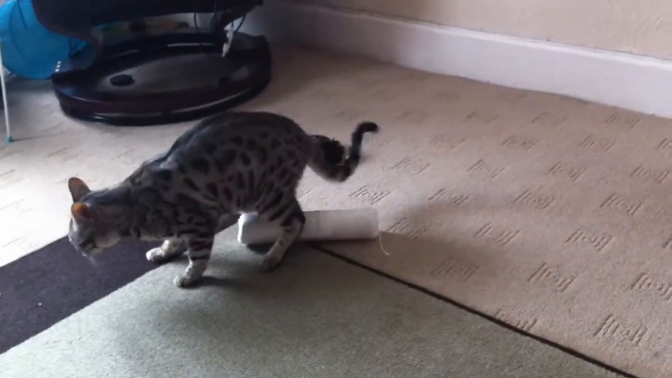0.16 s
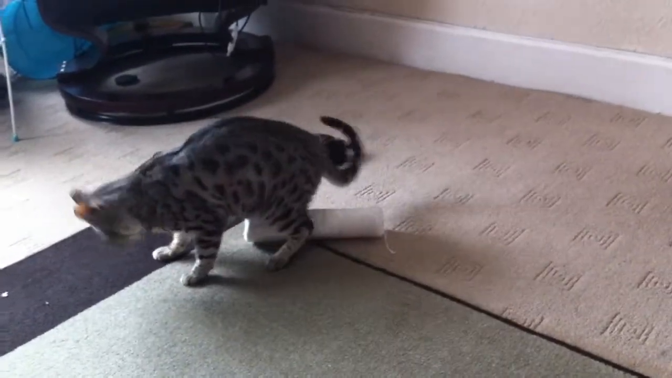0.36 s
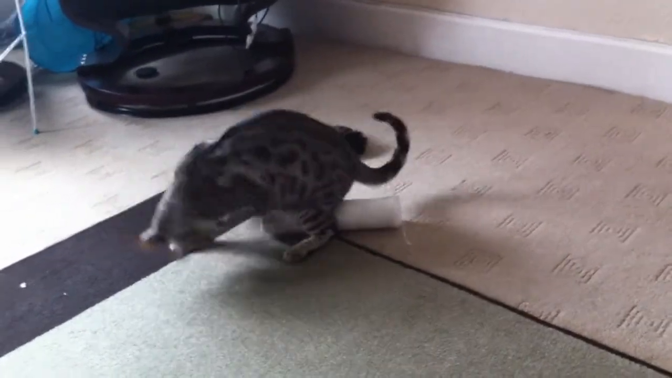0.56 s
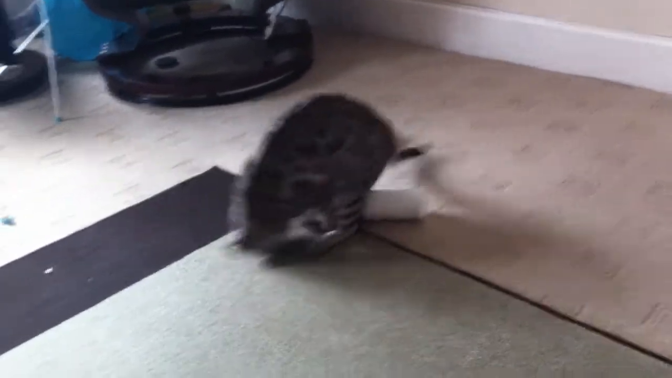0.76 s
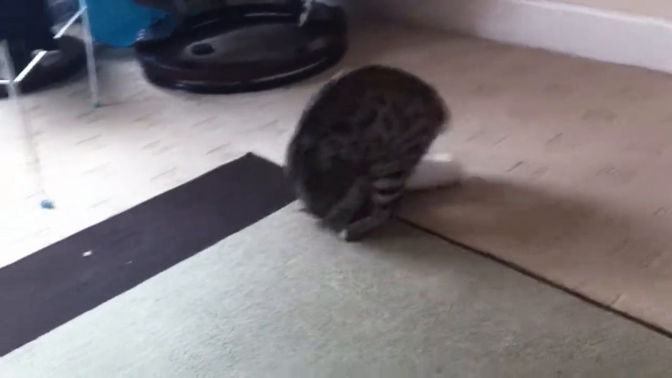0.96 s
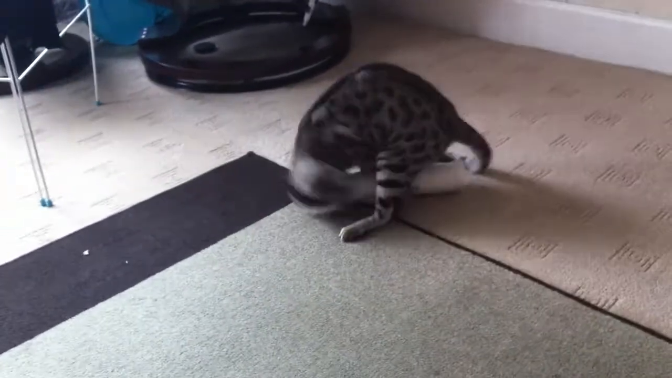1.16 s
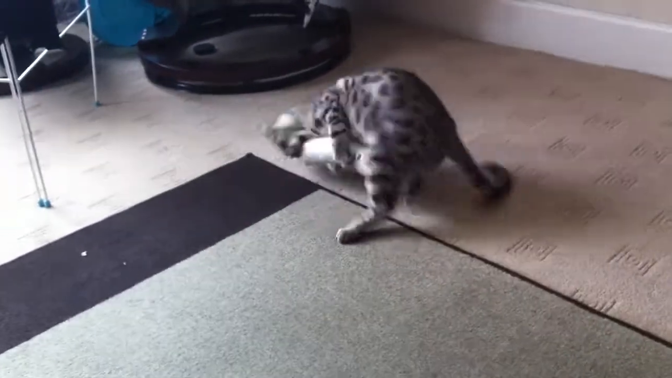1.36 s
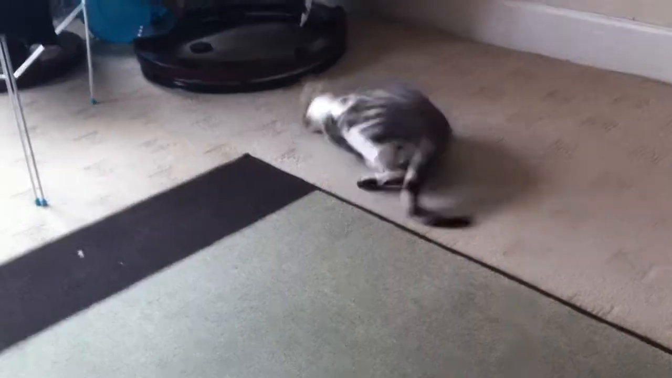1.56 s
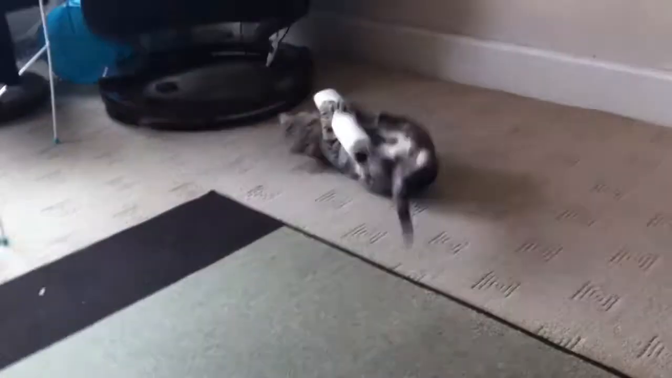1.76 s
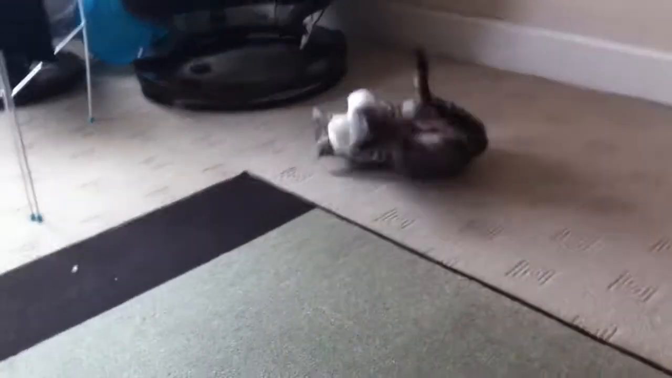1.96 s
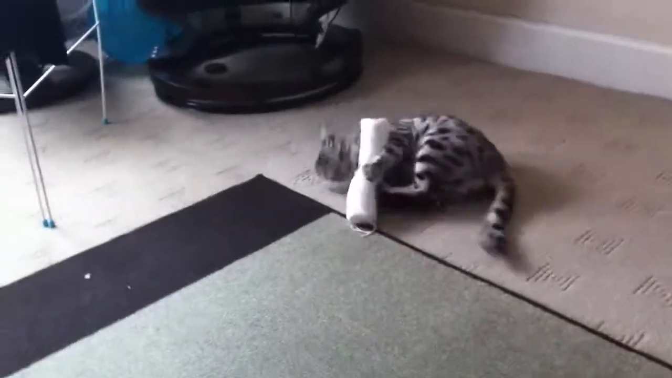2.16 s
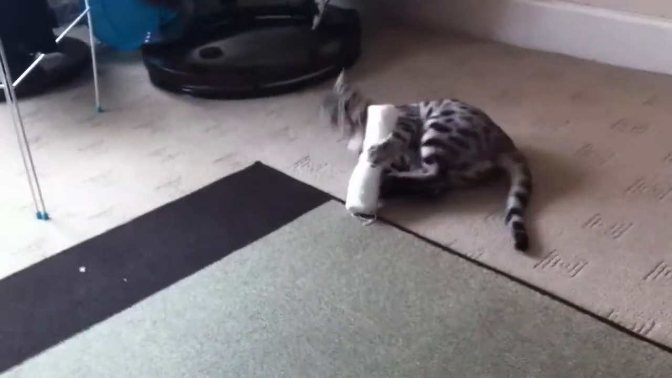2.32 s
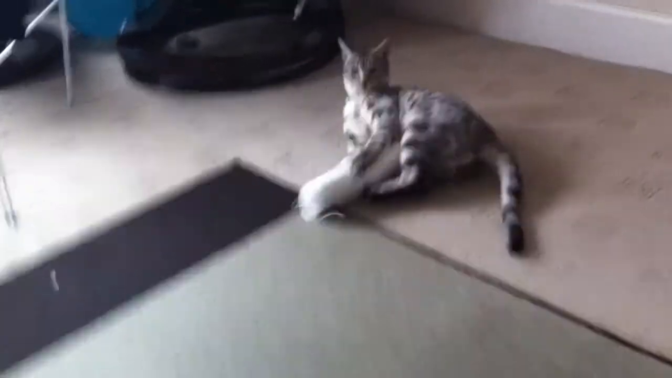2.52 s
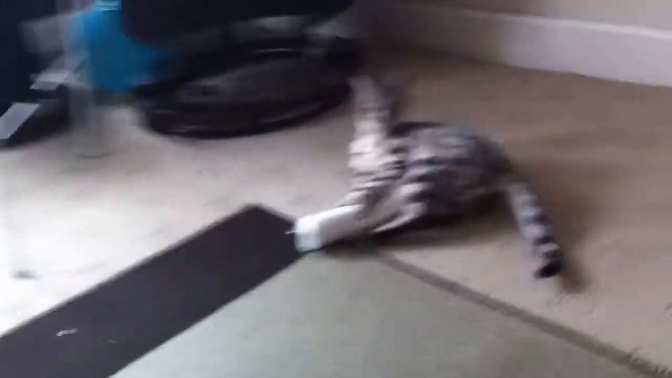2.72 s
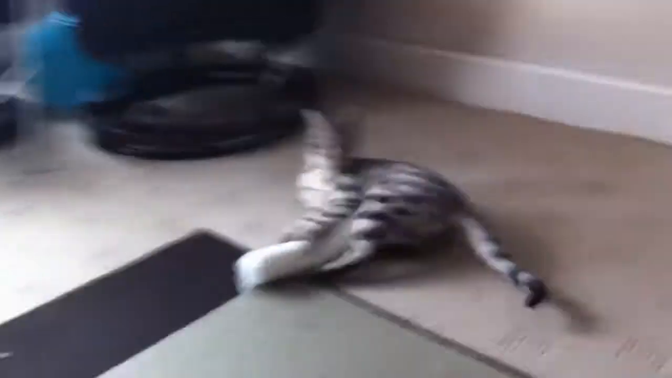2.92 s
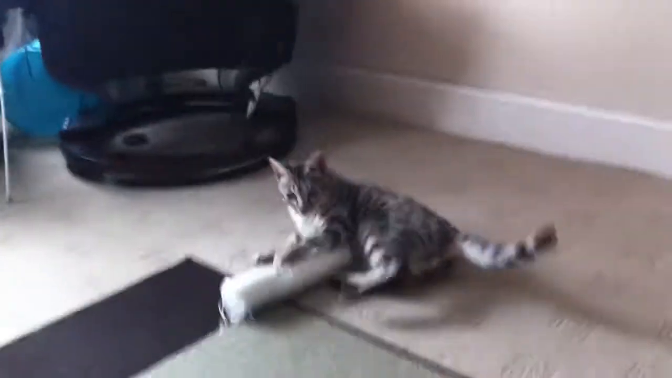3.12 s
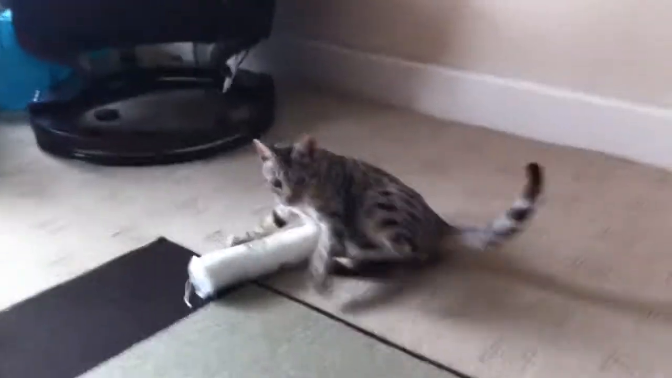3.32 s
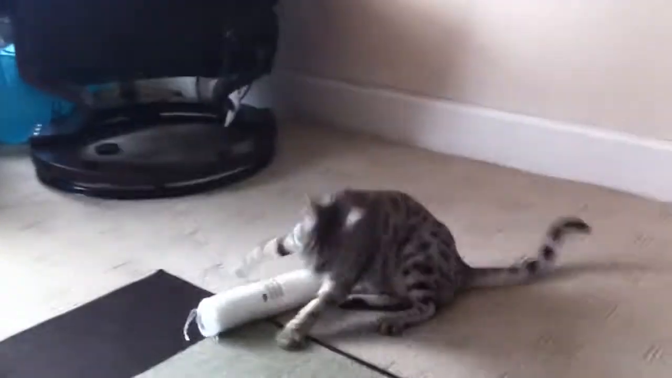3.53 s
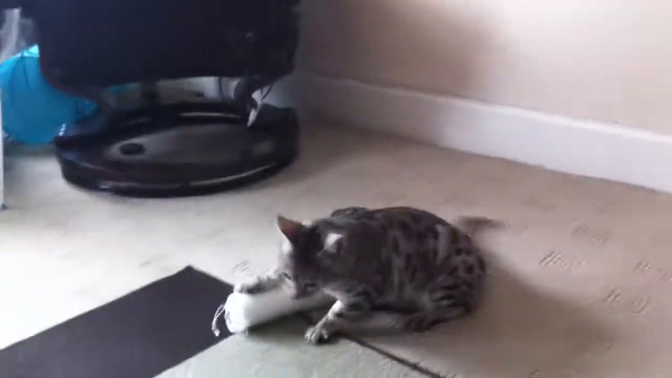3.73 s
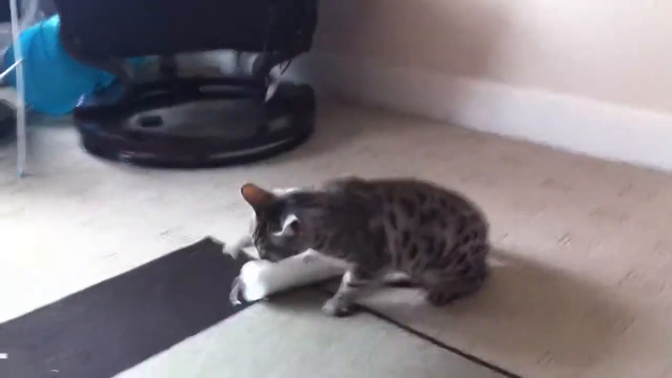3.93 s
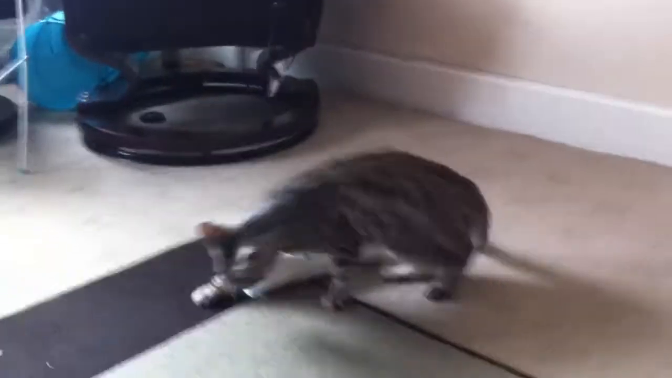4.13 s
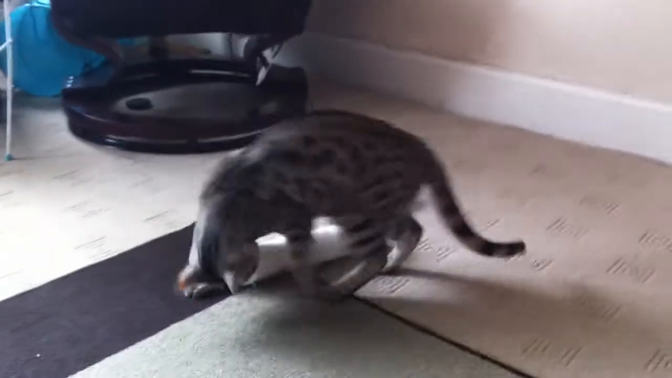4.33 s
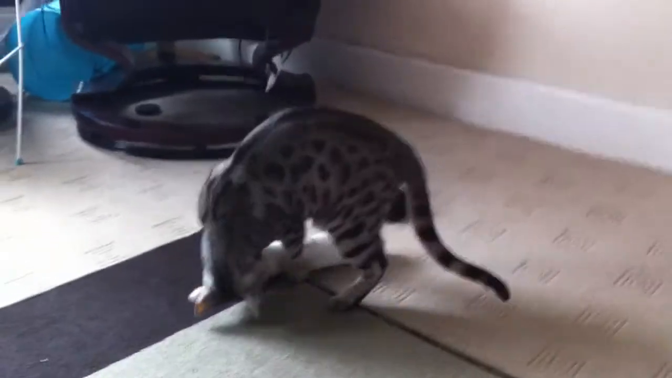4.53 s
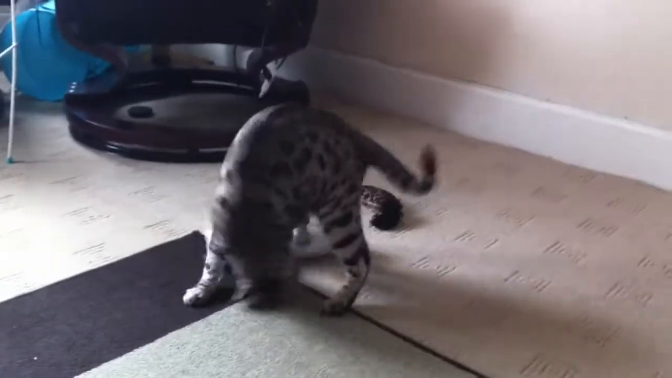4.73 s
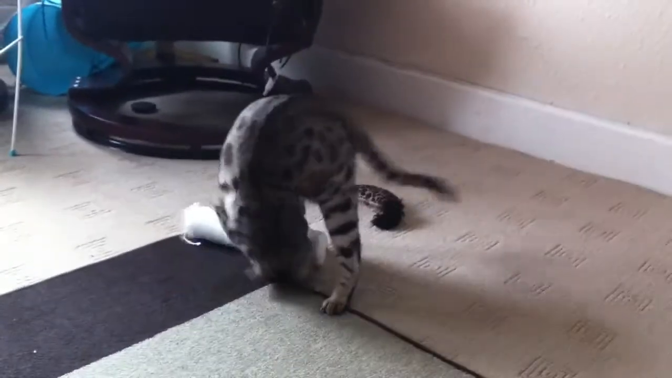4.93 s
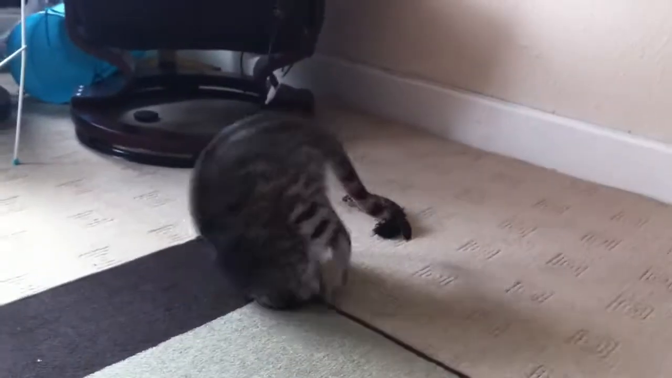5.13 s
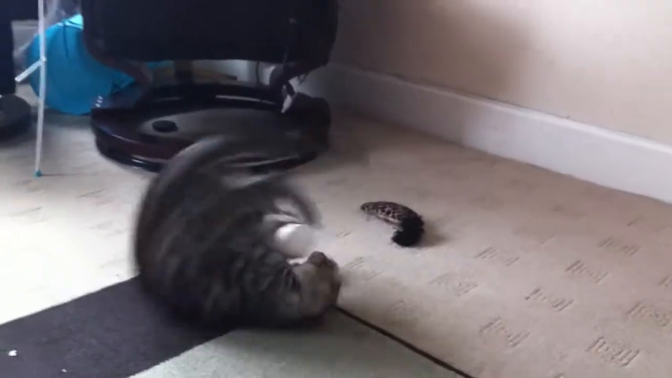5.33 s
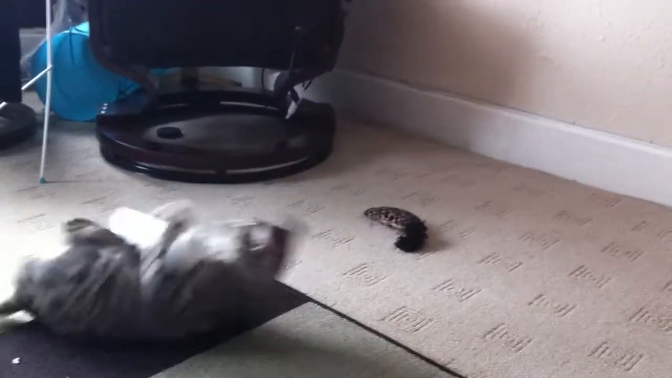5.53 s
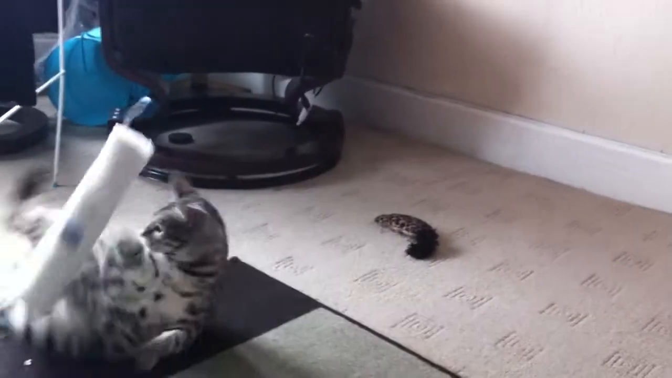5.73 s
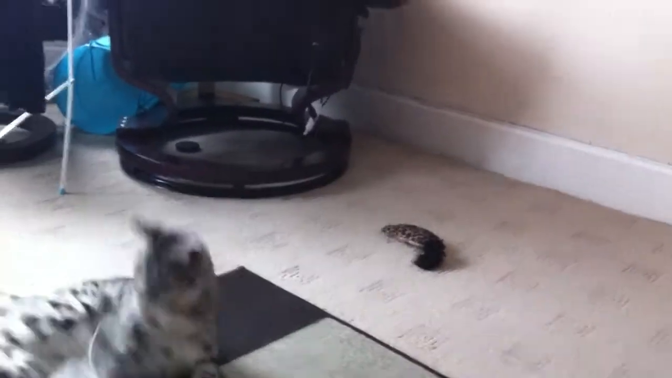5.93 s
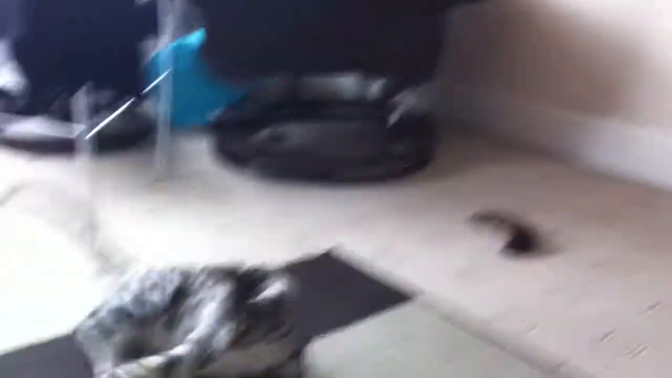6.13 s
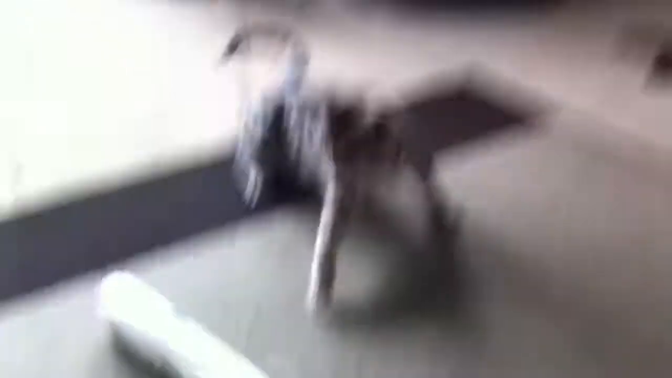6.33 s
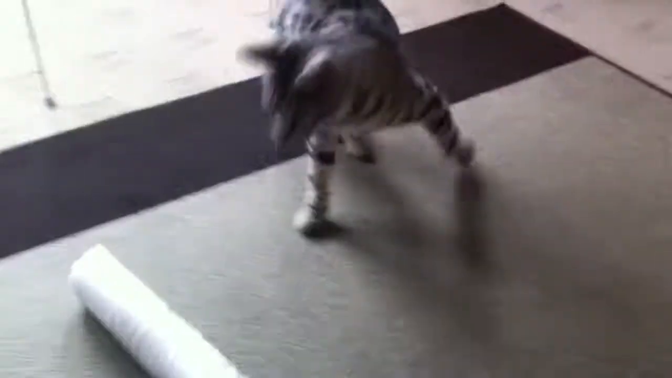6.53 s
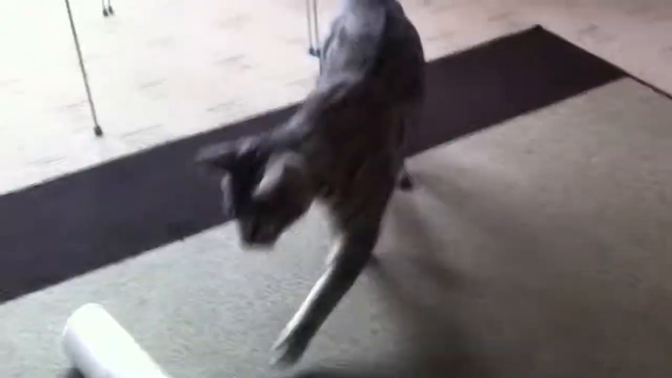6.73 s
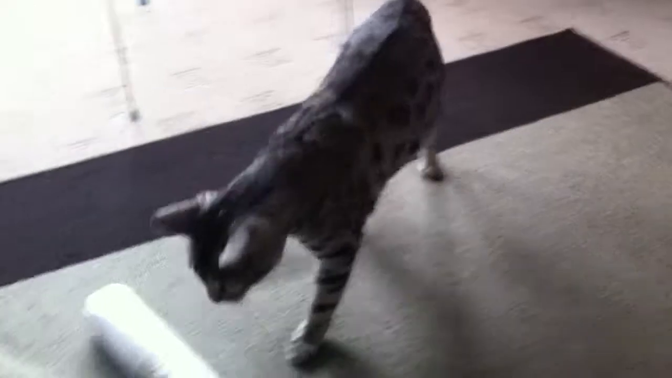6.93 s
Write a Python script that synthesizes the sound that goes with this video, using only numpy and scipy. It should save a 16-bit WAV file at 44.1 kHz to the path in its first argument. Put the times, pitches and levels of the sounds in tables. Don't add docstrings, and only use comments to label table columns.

```python
import sys
import numpy as np
from scipy import signal
from scipy.fft import rfft, irfft
from scipy.io import wavfile
from scipy.ndimage import uniform_filter1d

SR = 44100
rng = np.random.default_rng(int(sys.argv[2]) if len(sys.argv) > 2 else 0)


def gain_from_db(level_db):
    decades = np.asarray(level_db, float) / 20
    return 10 ** decades


def transcribe(signal):
    frames = np.atleast_2d(signal).T
    limited = np.clip(frames, -1, 1)
    pcm = np.round(limited * 32767).astype(np.int16)
    wavfile.write(sys.argv[1], SR, pcm)


N = 311787


def level(x, db=0):
    return x * gain_from_db(db) / np.sqrt(np.mean(x ** 2))


def add(out, s, x):
    i = int(s * SR)
    out[i:i + len(x)] += x[:N - i]


def band_filter(x, order, hz, kind="low"):
    return signal.sosfilt(signal.butter(order, hz, kind, fs=SR, output="sos"), x)


def resonance(x, hz, width_hz):
    return signal.lfilter(*signal.iirpeak(hz, hz / width_hz, fs=SR), x)


def colour(x, spectrum):
    hz, db = np.transpose(spectrum)
    f = np.maximum(np.fft.rfftfreq(4096, 1 / SR), 1)
    cepstrum = irfft(np.interp(np.log(f), np.log(hz), db) * np.log(10) / 20)
    cepstrum[1:2048] *= 2
    cepstrum[2049:] = 0
    return signal.fftconvolve(x, irfft(np.exp(rfft(cepstrum))))[:len(x)]


def walk(rate):
    k = int(SR / rate)
    held = np.repeat(rng.standard_normal(N // k + 1), k)
    return 0.78 * uniform_filter1d(uniform_filter1d(held, k), k)[:N]


def swing(hz, cycles):
    u = np.arange(int(4 * cycles * SR / hz)) * hz / SR / (cycles / 2)
    return np.sin(np.pi * cycles * u) * u * np.exp(1 - u)


# frequency in Hz, level in dB per Hz.
HISS_COLOUR = [(15, -66), (25, -32), (55, -24), (80, -15), (102, -5.5), (130, -7), (217, 0.5), (249, -5.5),
               (285, 0), (335, -7), (591, -9.5), (11900, -18.5), (14800, -17), (16500, -15)]


def quiet():
    hiss = level(colour(rng.standard_normal(N), HISS_COLOUR), -68) * gain_from_db(0.24 * walk(3.6))
    rumble = band_filter(rng.standard_normal(N), 4, 28) * gain_from_db(4.1 * walk(4.5))
    hum = resonance(rng.standard_normal(N), hz=189.6, width_hz=3.8)
    return hiss + level(rumble, -100) + level(hum, -77.5)


# middle in seconds, level in dB, length in seconds.
JOLTS = [
    (.87, -72, .05),
    (1.19, -70, .03),
    (1.375, -62, .035),
    (1.52, -67, 0.017),
    (2.163, -64, 0.027),
    (3.048, -68, .04),
    (5.05, -68, .05),
    (5.46, -66, 0.034),
    (5.78, -70, 0.036),
    (6.13, -57, 0.027),
]


def jolts():
    t = np.arange(N) / SR
    out = np.zeros(N)
    for s, db, length in JOLTS:
        u = 4 * (t - s) / length
        out += gain_from_db(db) * u * np.exp(-u ** 2 / 2)
    return out


# delay in seconds, level in dB.
ECHOES = [
    (.0044, -46),
    (.0062, -45),
    (0.0094, -25),
]


def room(x, wet_db):
    t60, treble_t60 = 0.46, 0.36
    t = np.arange(SR // 2) / SR
    dense = np.minimum(0.011 + 6 * t, 1)
    hits = rng.random(len(t)) < dense
    echoes = rng.standard_normal(len(t)) * hits / np.sqrt(dense) * (t > .0035)
    dull = band_filter(echoes, 1, 2500)
    tail = dull * gain_from_db(-60 * t / t60) + (echoes - dull) * gain_from_db(-60 * t / treble_t60)
    tail *= gain_from_db(wet_db) / np.sqrt(np.sum(tail ** 2))
    for lag, db in ECHOES:
        add(tail, lag, -gain_from_db(db) * np.array([.25, .5, .25]))
    return x + signal.fftconvolve(x, tail)[:N]


# time in seconds, share from 0 to 1.
GLANCE = [(0, .6), (2.8, .6), (3.2, .3), (5.3, .3), (5.7, .05), (7.07, .15)]
# frequency in Hz, level in dB.
FLOOR_COLOUR = [(200, 0.5), (250, 2), (310, -3), (380, -1.5), (450, 1), (560, -0.5), (690, 0.5),
                (900, -0.5), (16000, 0)]


def glance(x):
    lag_s = .00015
    share = np.interp(np.arange(N) / SR, *np.transpose(GLANCE))
    late = np.interp(np.arange(N) - lag_s * SR, np.arange(N), x)
    lift = resonance(x, hz=2415, width_hz=850)
    both = (x + share * (late + 0.49 * lift)) / np.sqrt(1 + share ** 2)
    dip = resonance(both, hz=3270, width_hz=430)
    return colour(both - 0.54 * share * dip, FLOOR_COLOUR)


def squeak():
    middle_s, hz, half_s, db = 3.56, 6150, .035, -73
    t = np.arange(N) / SR - middle_s
    cycles = hz * (t + middle_s) - 2500 * t ** 2
    return gain_from_db(db) * np.exp(-(t / half_s) ** 2) * np.sin(2 * np.pi * cycles + 4.5 * walk(150))


def ring(hz, t60, sag):
    t = np.arange(int(1.2 * t60 * SR) + 8) / SR
    fade = gain_from_db(-60 * t / t60) * np.minimum(1.5 * hz * t, 1)
    return np.sin(2 * np.pi * hz * (t - sag * t ** 2 / t60)) * fade


# start in seconds, level in dB, pitch in Hz,
# time to fade 60 dB in seconds.
KNOCKS = [(0.9548, -33.5, 440, 0.032), (1.09, -40.5, 540, 0.093), (1.279, -32, 550, 0.13),
          (1.289, -33, 684, 0.091), (1.295, -40.5, 434, .2), (1.3, -42, 313, 0.184),
          (1.36, -33.5, 594, 0.068), (1.935, -50, 514, 0.067), (6.278, -52, 230, .08),
          (2.314, -48, 239, 0.056), (3.0416, -40, 400, 0.079), (3.303, -45, 463, 0.064),
          (3.609, -52, 226.5, 0.2), (4.773, -46, 520, 0.045), (5.051, -48.5, 138.4, 0.38),
          (5.168, -45.5, 449, 0.092), (5.454, -62, 596, 0.041), (5.582, -44.5, 138, 0.093),
          (5.711, -41, 253.6, 0.18), (6.0065, -29.5, 498, 0.048), (6.012, -40, 524, 0.14),
          (6.036, -42, 430, 0.074), (6.007, -44, 865, .06), (5.78, -41, 795, .1), (6.121, -27, 324, 0.05),
          (6.31, -55, 154, 0.12), (4.47, -62, 515, 0.12), (6.326, -51.5, 530, 0.11),
          (6.391, -53, 400, 0.15), (6.125, -46, 103, 0.26), (6.83, -69, 191.6, 0.63),
          (3.78, -52, 300, 0.14), (2.202, -52, 150, 0.097)]
# pitch as a ratio, level in dB, share of the fade time.
ROLL_MODES = [
    (.78, -8, .9),
    (1, 0, 1),
    (1.22, -7, .7),
    (1.9, -9, .3),
    (2.7, -14, .2),
]


def knocks():
    out = np.zeros(N)
    chances = rng.standard_normal((len(KNOCKS), len(ROLL_MODES)))
    for (s, db, hz, t60), chance in zip(KNOCKS, chances):
        for (ratio, mode_db, share), r in zip(ROLL_MODES, chance):
            mode = ring(hz * ratio * (1 + 0.037 * r), t60 * share, sag=0.153)
            add(out, s, gain_from_db(db + mode_db - 3.5) * mode)
    return out


# start in seconds, level in dB.
HAIRS = [(0.7208, -64), (0.7208, -56), (0.8515, -50), (0.9548, -58), (0.9947, -53), (0.9947, -51),
         (1.0086, -46), (1.0361, -45), (1.051, -40), (1.1568, -54), (1.1807, -48), (1.2775, -33),
         (1.3578, -34), (1.4756, -54), (1.5384, -52), (1.5384, -46), (1.6696, -48), (1.7759, -51),
         (1.9355, -31), (2.0707, -47), (2.1131, -50), (2.1565, -40), (2.3371, -46), (2.403, -49),
         (2.4384, -48), (2.4953, -46), (2.616, -46), (2.6459, -47), (2.9362, -52), (3.0435, -42),
         (3.1248, -42), (3.2301, -57), (3.7768, -51), (3.8886, -52), (4.5112, -56), (4.5231, -52),
         (4.6957, -57), (4.7062, -58), (4.7566, -52), (4.8125, -54), (4.8284, -51), (5.0275, -52),
         (5.1343, -44), (5.256, -51), (5.452, -37), (5.5952, -52), (5.7144, -46), (5.7633, -25),
         (6.0437, -42), (6.127, -37), (6.2218, -51), (6.3789, -55), (6.4433, -56), (6.806, -65),
         (6.806, -48), (6.8962, -57)]


def hairs():
    out = np.zeros(N)
    for (s, db), r in zip(HAIRS, rng.random(len(HAIRS))):
        add(out, s + .0007, gain_from_db(db - 1.5) * swing(12500 * (.9 + .2 * r), 2.2))
    return out


def pitch_scatter(rows):
    return np.exp(.1 * rng.standard_normal((len(rows), 2)))


# start in seconds, level in dB.
THREADS = [(0.9336, -53.0), (1.0949, -45), (1.1783, -38), (1.2404, -48.0), (1.2615, -51.0), (1.5363, -37),
           (1.649, -49.0), (1.968, -39), (2.1171, -47), (2.1849, -34), (2.279, -45), (2.404, -51.0),
           (2.4468, -47), (2.4635, -46.0), (2.5392, -38.0), (2.5577, -44.0), (2.6262, -42), (2.7689, -50.0),
           (2.7723, -52), (2.787, -57), (3.044, -44), (3.0664, -43.0), (3.778, -44.0), (3.867, -55),
           (3.8933, -49), (3.9917, -60), (4.0114, -53.0), (4.0385, -54.0), (4.2137, -56.0), (4.5126, -48.0),
           (4.525, -45), (4.6563, -54), (4.8131, -49), (5.0497, -56), (5.1722, -45), (5.639, -52),
           (5.7511, -38), (5.7756, -25.5), (5.9167, -49.0), (6.046, -33), (6.3445, -49.0), (6.3587, -53.0),
           (6.3798, -50.0), (6.4444, -46), (6.8063, -46), (7.0416, -62), (7.0616, -62)]
# start in seconds, level in dB.
CATCHES = [(0.5162, -60), (0.523, -57), (0.6594, -59), (0.7219, -52), (0.8221, -49), (0.9604, -43),
           (1.186, -35), (1.2275, -42), (1.26, -59), (1.2842, -38), (1.3581, -30), (1.4716, -54),
           (1.9956, -39), (2.114, -44), (2.1576, -37), (2.3911, -55.0), (2.4191, -58), (2.4234, -51),
           (2.497, -49), (2.5015, -46), (2.595, -52), (2.6261, -48), (2.6335, -38), (2.7257, -48.0),
           (2.7837, -49.5), (2.8179, -50), (2.9634, -50), (3.046, -47), (3.053, -42), (3.3047, -51.0),
           (3.625, -60), (4.083, -69), (4.5033, -49), (5.172, -43.0), (5.4175, -58), (5.4573, -39),
           (5.7554, -50), (5.768, -48), (5.7789, -42), (5.7924, -37.0), (5.803, -36), (6.008, -61),
           (6.0677, -38), (6.124, -30), (6.345, -56), (6.7743, -72), (6.7885, -54), (7.0534, -53.0)]


def fine_snaps():
    rows = [(s, db - 16.5, db) for s, db in THREADS]
    rows += [(s, db, db - 12) for s, db in CATCHES]
    return [(s, db, 1700 * a, tick_db, 5400 * b)
            for (s, db, tick_db), (a, b) in zip(rows, pitch_scatter(rows))]


# start in seconds, level in dB.
PLUCKS = [(1.0166, -39), (1.0915, -39), (.995, -42), (1.0065, -43), (1.0105, -44), (2.115, -47),
          (2.322, -47), (2.338, -41), (2.4147, -46), (2.441, -37.5), (2.4467, -44), (2.538, -41),
          (2.6335, -37.5), (2.7837, -45), (2.9609, -50), (3.4762, -52), (3.523, -51), (3.5728, -56),
          (3.867, -53), (3.89, -53), (4.0349, -49), (4.229, -56), (3.49, -63), (4.523, -43), (4.6062, -42),
          (4.697, -42), (5.716, -41), (6.3443, -55), (6.663, -60), (6.7736, -55), (6.807, -52),
          (7.053, -56)]
# start in seconds, level in dB.
TUGS = [(.5556, -54), (0.5814, -51), (.752, -41), (.821, -56), (2.495, -38.5), (5.027, -45), (1.537, -42),
        (2.7221, -44.5), (2.951, -51), (3.0112, -54), (3.305, -62), (4.5523, -51), (4.658, -47.5),
        (4.773, -55), (5.5747, -63), (6.3799, -51), (6.4445, -52), (6.486, -53), (6.581, -50),
        (6.5926, -49.5), (6.612, -50), (6.652, -51), (6.7068, -53), (6.7219, -52), (6.9497, -52),
        (6.9714, -44.5), (7.0304, -56)]


def small_snaps():
    rows = [(s, db - 10, db) for s, db in PLUCKS]
    rows += [(s, db, db - 6) for s, db in TUGS]
    snaps_out = []
    for (s, db, tick_db), (a, b) in zip(rows, pitch_scatter(rows)):
        claw_hz = 5100 if s < 3.0 else 3720
        snaps_out.append((s, db, 1900 * a, tick_db, claw_hz * b))
    return snaps_out


# start in seconds, swing level in dB, swing pitch in Hz,
# tick level in dB, tick pitch in Hz.
SNAPS = [(.736, -44, 2140, -43, 5400), (.8535, -38, 1340, -45, 6300), (.9554, -35.5, 1710, -46, 5500),
         (1.182, -29, 2030, -40, 5450), (1.2766, -34, 2300, -31, 4600), (1.2784, -13, 1650, -27.5, 5400),
         (1.2794, -31, 2700, -22, 4600), (1.3585, -37, 1900, -21, 5000), (2.5264, -34.5, 2230, -45, 4400),
         (2.6236, -41, 1930, -50, 5300), (2.9371, -46, 2500, -44, 4600), (3.041, -27.5, 1540, -22, 3620),
         (3.1263, -33.5, 2170, -27, 5600), (3.0455, -40, 2000, -38, 7600), (3.052, -42, 1800, -44, 9500),
         (3.096, -52, 2000, -48, 11000), (4.7728, -42, 1500, -58, 3000), (4.707, -47, 1900, -52, 4500),
         (1.9362, -33, 2600, -35, 7000), (5.1352, -39.5, 1300, -37.5, 9000),
         (5.1621, -36.5, 1290, -46, 4500), (2.1628, -39, 1700, -33, 5000), (2.648, -39, 1600, -41, 5000),
         (1.3597, -28, 2500, -31, 5500), (5.4526, -53, 2320, -24, 5400), (5.4531, -28, 2300, -33, 4500),
         (5.454, -32, 2170, -34, 4000), (5.7644, -52, 2370, -19, 4940), (5.7649, -48, 2370, -28, 4640),
         (5.7705, -46, 2300, -25, 6300), (6.0797, -41, 2950, -41, 4100), (6.897, -46.5, 2220, -45, 4800),
         (6.8985, -50, 2220, -52, 4800)]


def snaps():
    out = np.zeros(N)
    rows = list(SNAPS) + small_snaps() + fine_snaps()
    burst = rng.standard_normal((len(rows), 90)) * np.exp(-np.arange(90) / (.0003 * SR))
    spit = band_filter(burst, 3, (6000, 10500), "band")
    for (s, db, hz, tick_db, tick_hz), fibre in zip(rows, spit):
        add(out, s, gain_from_db(db + 4) * swing(max(hz, 1300), .9))
        add(out, s + .0001, gain_from_db(tick_db + 2) * swing(tick_hz, 1.3))
        add(out, s + .0001, gain_from_db(tick_db - 6) * fibre / np.abs(fibre).max())
    return band_filter(out, 2, 350, "high")


def split(x):
    lo, mid, hi = 700, 3150, 8300
    cuts = [(lo, "low"), ((lo, mid), "band"), ((mid, hi), "band"), (hi, "high")]
    return [level(band_filter(x, 3, hz, kind)) for hz, kind in cuts]


# frequency in Hz, level in dB per Hz.
PILE = [(60, -32.5), (130, -8.5), (270, 1.5), (700, 2.5), (1150, 3), (1700, 3), (2700, 0.5), (3500, 1.5),
        (5000, -2), (7000, -8.5), (8300, -15), (10000, -13), (14900, -21.5), (16500, -27)]


def fibres(scatter_db, flicker_db, crackle_db, per_s):
    sizes = uniform_filter1d(rng.exponential(size=N), size=6)
    slips = level(rng.standard_normal(N) * gain_from_db(scatter_db * sizes))
    pop_size = gain_from_db(min(crackle_db, 13) + 8 * rng.random((2, N)) ** 2)
    popping = rng.random((2, N)) < per_s / SR
    dull, bright = popping * np.sign(rng.standard_normal((2, N))) * pop_size
    bands = split(colour(slips + dull, PILE))[:2] + split(colour(slips + bright, PILE))[2:]
    shared = walk(60)
    return [band * gain_from_db(flicker_db * (shared + walk(35))) for band in bands]


# start in seconds, level in dB,
# claw against brush in dB, time to fade 60 dB in seconds.
SHOVES = [(.715, -52.5, -3, 0.48), (.811, -54, -13, 0.33), (1.089, -47, -1.5, 0.27),
          (1.224, -46.5, -9, 0.051), (1.359, -38.5, -2, 0.14), (1.598, -49, 1, 0.084),
          (2.114, -58, -1, 0.085), (2.153, -58, -3, 0.079), (2.161, -40.5, -1.5, 0.13),
          (1.74, -58, -2, .12), (1.995, -59, -1, 0.072), (2.647, -55, 2, 0.083), (1.3, -38, -7, 0.092),
          (2.782, -56.5, 2, 0.16), (2.937, -59.5, -9, 0.16), (3.042, -43.5, -1, 0.14),
          (3.127, -48, 1, 0.16), (3.302, -58, -0.5, 0.26), (4.213, -65, 2, 0.2), (4.758, -48.5, -7, 0.12),
          (4.89, -54.5, 1, 0.19), (5.023, -52, 1, 0.3), (5.075, -54, -9, 0.26), (5.167, -48.5, -3.5, 0.31),
          (6.121, -40.5, 3.1, 0.25), (6.221, -50.5, -2.5, 0.18), (6.443, -55.5, -2.5, 0.12),
          (6.636, -62.5, -11, 0.19)]
# start in seconds, level in dB,
# claw against brush in dB, time to fade 60 dB in seconds.
SWIPES = [(.554, -66, -4, 0.17), (.751, -52, -20, 0.066), (.85, -47, 3, .13), (1.046, -50, 2.7, 0.16),
          (1.182, -43, -7, 0.071), (1.28, -30.5, -5, 0.078), (1.532, -44, -0.5, 0.26),
          (1.847, -51.5, 0.5, 0.96), (2.494, -48, 0.5, 0.17), (2.53, -60, 3, 0.089), (2.621, -49, -1, 0.18),
          (4.822, -50.5, -0.5, 0.39), (5.52, -48, -4, 0.076), (5.648, -52.5, 1, 0.18),
          (6.58, -65, -6, 0.14), (6.945, -63, -3.5, 0.12), (4.502, -54.5, 0, .3), (4.7, -53, 1, .2),
          (6.97, -60, -3, .1)]
# start in seconds, level in dB, claw against brush in dB,
# time to fade 60 dB in seconds.
RAKES = [(.994, -56, 7, 0.15), (1.41, -61, 13, 0.12), (1.669, -62.5, 11.5, 0.15), (1.783, -62, 12.5, 0.058),
         (1.93, -44.5, 5, 0.26), (2.337, -65, 13, 0.088), (2.44, -64, 10.5, 0.54), (3.24, -60, 4.5, 0.31),
         (3.774, -51, 3.5, 0.2), (4.011, -65.5, 5.5, 0.25), (5.135, -52, -8, 0.2),
         (5.453, -39, -2.5, 0.083), (5.714, -58, 3, 0.25), (5.749, -54, 0, 0.19), (5.7655, -43.5, 6.5, 0.2),
         (6.041, -43.5, 2.5, 0.21), (6.076, -49, 6, 0.06), (6.127, -40, 8.5, 0.024), (6.789, -67, 8, 0.072)]


def scuffs():
    gains = np.zeros((4, N))
    for rows, weight_db in ((SHOVES, -4.5), (SWIPES, -12), (RAKES, -7.5)):
        for s, db, claw_db, t60 in rows:
            t = np.arange(int(1.2 * t60 * SR)) / SR
            rise = max(0.00045 + 0.0098 * t60, 1e-4)
            shape = (1 - np.exp(-t / rise)) * gain_from_db(db + 1.5 - 60 * t / t60)
            band_db = (weight_db, 0, claw_db - 20 * t, claw_db - 8.5 - 40 * t)
            for gain, rel_db in zip(gains, band_db):
                add(gain, s, shape * gain_from_db(rel_db))
    bands = fibres(scatter_db=4.0, flicker_db=1.5, crackle_db=15.5, per_s=260)
    return sum(b * g for b, g in zip(bands, gains))


# time in seconds, pressure in dB, claws out in dB.
DRAG = [(.4, -77.5, -2), (.58, -70, 0.5), (.9, -62, -8), (1.2, -52, -3.5), (1.52, -61.5, 2), (1.7, -55, 2),
        (2.2, -50.5, 1.5), (2.35, -61, 3.5), (2.87, -68, 6), (3.1, -62.5, -8), (3.6, -70.5, 0.5),
        (4.44, -78.5, 4.5), (4.75, -57.5, -4), (5.3, -58, 1.5), (5.72, -55.5, 0), (5.95, -75, -8),
        (6.3, -61.5, -4.5), (7.07, -66.5, -1)]
# middle in seconds, length in seconds, level in dB,
# claw against brush in dB.
SLIDES = [(1.02, 0.12, -57, 4), (1.055, .045, -51, 5), (1.42, .06, -56, 5), (2.165, .03, -54, 8),
          (1.38, 0.13, -53, -4), (2.02, 0.2, -77, -11), (2.62, 0.35, -57.5, -2.5), (3.88, 0.36, -74, -3),
          (4.34, 0.24, -69.5, -0.5), (4.587, 0.17, -67, -1), (1.767, .1, -63, -8), (2.555, 0.072, -60, 3),
          (6.405, 0.16, -64.5, -1), (4.764, 0.074, -60, -3), (5.799, 0.092, -43, 1.5),
          (6.158, 0.15, -44.5, -14)]


def drag():
    s, press, claws = np.transpose(DRAG)
    t = np.arange(N) / SR
    brush = gain_from_db(np.interp(t, s, press, left=-120))
    claw = brush * gain_from_db(np.interp(t, s, claws))
    weight = brush * gain_from_db(-9)
    for mid, length, db, claw_db in SLIDES:
        swell = gain_from_db(db) * np.exp(-(4 * (t - mid) / length) ** 2 / 2)
        weight = weight + swell * gain_from_db(-13)
        brush = brush + swell
        claw = claw + swell * gain_from_db(claw_db)
    bands = fibres(scatter_db=7.5, flicker_db=3.0, crackle_db=11.0, per_s=240)
    gains = weight, brush, claw, claw * gain_from_db(-8)
    return gain_from_db(-3.5) * sum(b * g for b, g in zip(bands, gains))


def scene():
    soft = room(drag() + scuffs() + knocks() + squeak(), wet_db=-8.5)
    sharp = room(snaps() + hairs(), wet_db=-7)
    cat = band_filter(glance(soft + sharp), 4, 123.5, "high")
    return (cat + jolts() + quiet())[None]


def top_cut(x):
    return signal.sosfilt(signal.butter(12, 16830, fs=SR, output="sos"), x)


# start in seconds, length in seconds, lost above Hz.
TREBLE_DIPS = [(1.2655, .008, 2500), (1.5205, .008, 2800), (3.0305, .007, 2300), (4.686, .005, 4500),
               (3.133, .008, 10500), (1.366, .012, 13000), (2.345, .008, 13000), (.943, .008, 11000),
               (5.4445, .005, 2000), (5.748, .012, 7500), (2.149, .008, 8500), (1.917, .014, 12000),
               (6.0255, .0135, 2500)]


def record(dry):
    out = dry - .0001
    for s, length, hz in TREBLE_DIPS:
        mute = np.zeros(N)
        add(mute, s, signal.windows.tukey(int(length * SR), .3))
        treble = signal.sosfiltfilt(signal.butter(8, hz, "high", fs=SR, output="sos"), dry)
        out = out - mute * treble
    out = signal.sosfiltfilt(signal.ellip(12, .2, 22, 15950, fs=SR, output="sos"), out)
    return top_cut(out)


dry = scene()
out = record(dry)
transcribe(out)
```